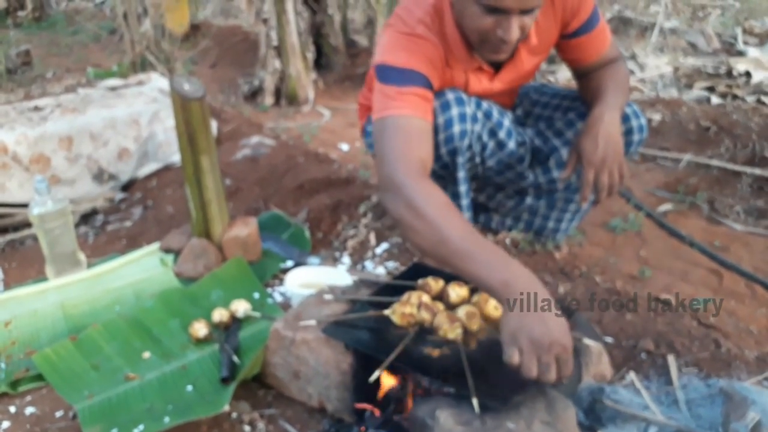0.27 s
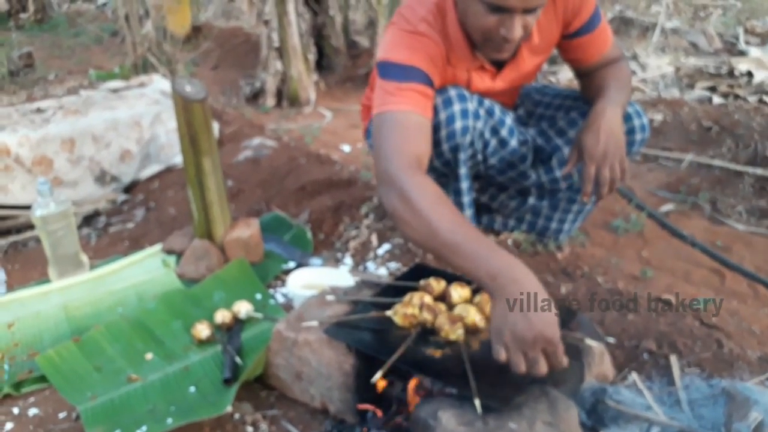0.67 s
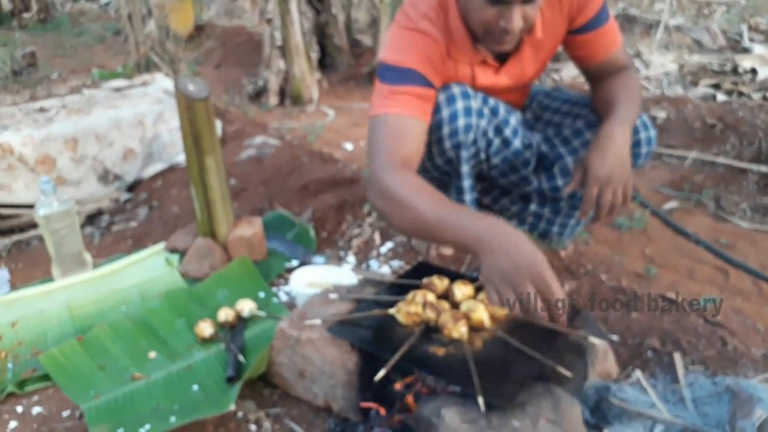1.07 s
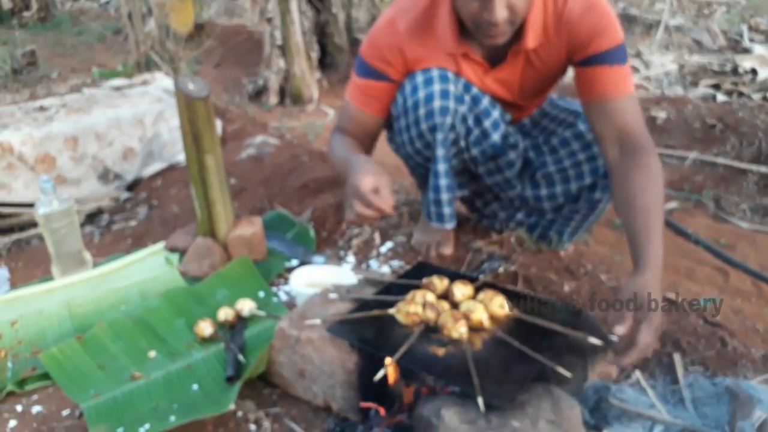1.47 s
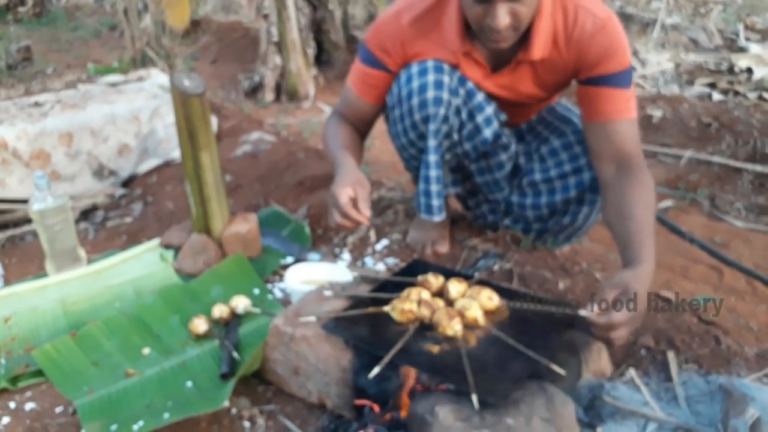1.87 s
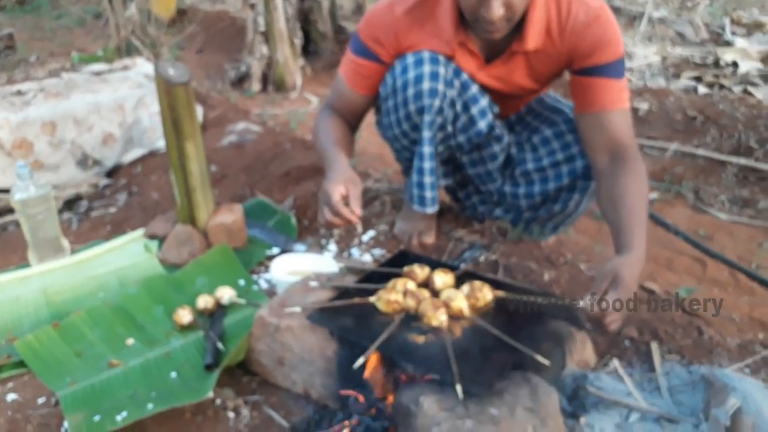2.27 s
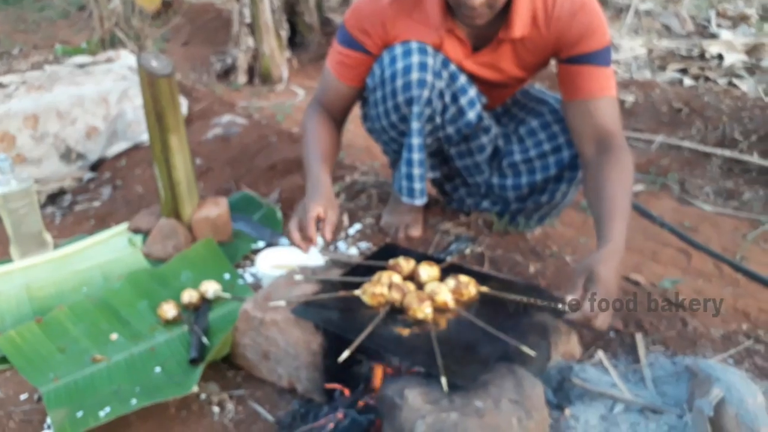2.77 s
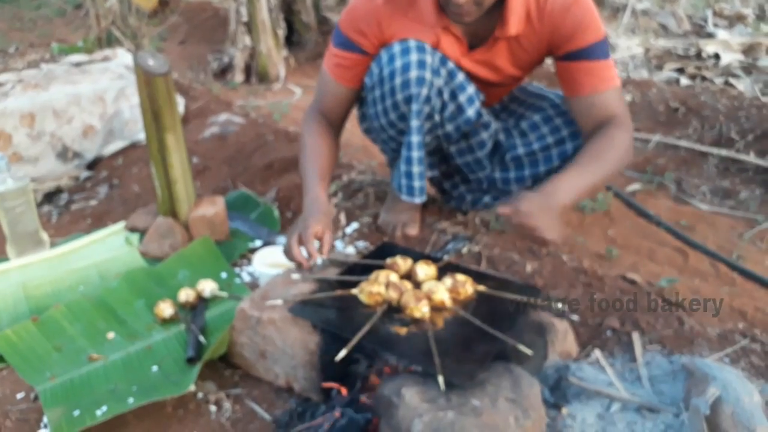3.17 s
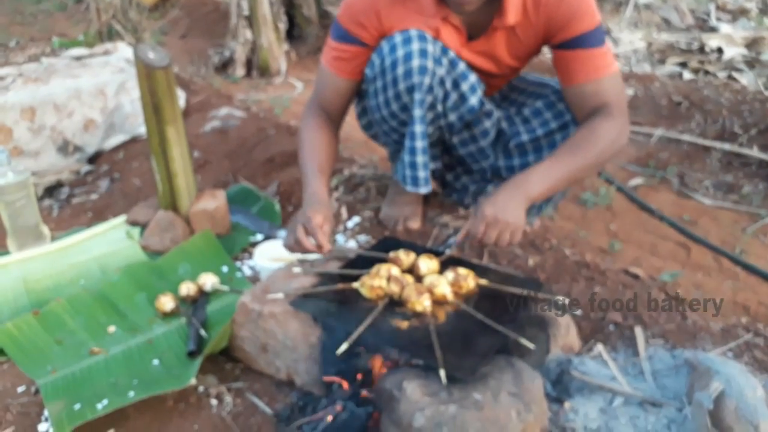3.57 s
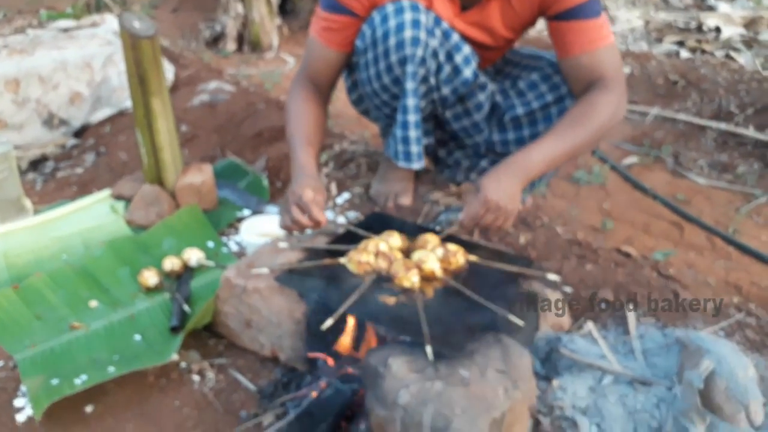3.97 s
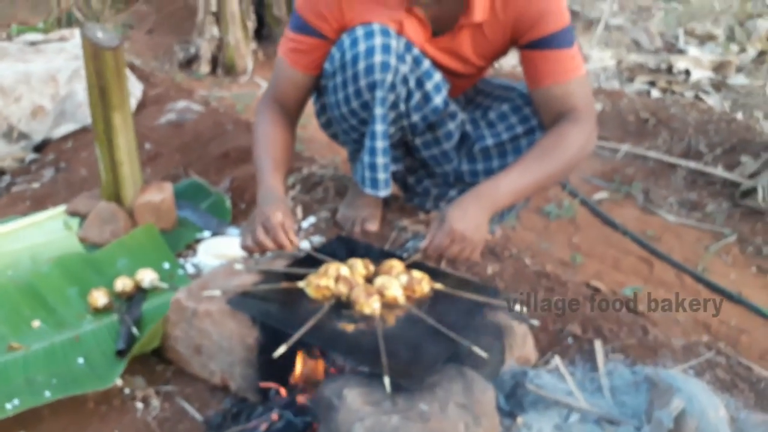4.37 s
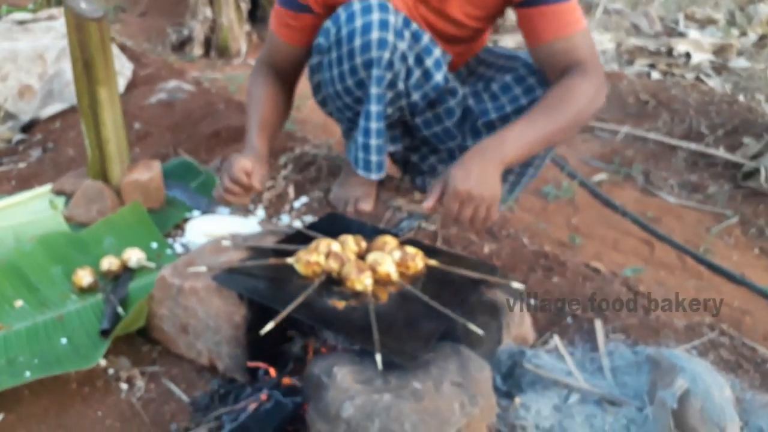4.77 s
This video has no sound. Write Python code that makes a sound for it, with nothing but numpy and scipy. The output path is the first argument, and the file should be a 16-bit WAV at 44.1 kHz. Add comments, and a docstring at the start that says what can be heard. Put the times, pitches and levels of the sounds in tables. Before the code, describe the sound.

Oil sizzles lightly and steadily under skewered food on a flat pan for the whole five seconds, fairly close and outdoors. The sound is a fine, high fizz with irregular ticks of bursting bubbles, the clearest at about 1.5 seconds and others near 1.2 and 3.4. The wood fire gives soft, short thuds, mostly between 2 and 3 seconds. At about 3.7 seconds the wood spits, and at 3.9 it gives one sharp pop, the loudest moment. Around then the sizzle turns muffled and stays duller, dropping in level at the very end. In the background a small bird gives five short, high, raspy falling chirps, at roughly 0.2, 1.1, 1.9, 3.7 and 4.8 seconds. Very faint rustles come around 2.2 to 2.6 seconds and again after 4.3. A barely audible low murmur of air lies underneath.

```python
"""Skewers sizzling over a wood fire

Skewered food fries in oil on a flat pan, outdoors. Countless tiny bubbles burst into a sizzle,
larger ones tick, and the sizzle turns muffled late on. The fire thuds softly as gas flares, then
spits once and gives one sharp pop as steam breaks out of the wood. Behind it are soft rustles
around the stove, a small bird chirping five times among the trees, and a low murmur of air."""
import sys
import numpy as np
from scipy import signal
from scipy.fft import rfft, irfft, next_fast_len
from scipy.io import wavfile
from scipy.ndimage import map_coordinates

SR = 44100
rng = np.random.default_rng(int(sys.argv[2]) if len(sys.argv) > 2 else 0)


def inscribe(sig):
    """Save sig as 16-bit PCM at rate SR to the path in sys.argv[1].

    A 1-D sig is mono; a 2-D sig holds one channel per row.
    Samples are clipped to [-1, 1] before scaling.
    """
    pcm = np.round(np.clip(np.atleast_2d(sig).T, -1, 1) * 32767)
    wavfile.write(sys.argv[1], SR, pcm.astype(np.int16))


N = 221776
TIME = np.arange(N) / SR


# How hard the oil fries: time_s, level_db
FRYING_LEVEL = [(0.0, -51.5), (0.25, -50.5), (0.6, -50.5), (1.08, -47), (1.46, -49), (1.62, -51),
                (2.72, -48.5), (3.35, -51.5), (3.78, -48), (4.43, -50), (4.89, -51), (5.03, -60.5)]

def sizzle(fizz_db=1.07, thinning_db=2, pops_db=-5.5, bubbles_db=-3):
    """Bursting bubbles: a dense fizz that thins when muffled, under flurries of sparser pops."""
    fizz = amp(fizz_db - thinning_db * curve(MUFFLING)) * bursts(per_s=7000, spread_db=2.0)
    pops = amp(pops_db) * bursts(per_s=370, spread_db=7.0)
    flurry = amp(1.6 * wobble(70))
    surge = amp(1.1 * wobble(45))
    crackle = (pops + amp(bubbles_db) * bubbles()) * flurry
    return amp(curve(FRYING_LEVEL)) * surge * sizzle_colour(fizz + crackle, makeup_db=6.5)


# Crackling bubbles, one row a size: pitch_hz, bursts_per_s, level_db
BUBBLE_SIZES = [(3790, 230, -4.5), (4620, 150, -8), (6200, 200, -3.5), (8200, 160, -3), (12500, 140, -2)]

def bubbles():
    """Each bubble rings for a cycle or two at the pitch of its size."""
    out = np.zeros(N)
    for hz, per_s, db in BUBBLE_SIZES:
        ring = signal.iirpeak(hz, Q=2.7, fs=SR)
        out += amp(db) * unit(signal.lfilter(*ring, bursts(per_s, spread_db=6.5)))
    return out


# Crossfade from an open (0) to a muffled (1) sound: time_s, muffled_share
MUFFLING = [(0, 0.01), (2.0, 0.14), (2.3, .19), (3.6, 0.06), (3.92, 0.87), (4.5, 0.93), (5.03, 0.95)]
# EQ of the open sizzle: frequency_hz, gain_db
OPEN_SIZZLE_EQ = [(300, -33), (1200, -24.5), (1900, -19), (2400, -12), (2850, -13.5), (3500, -1),
                  (4300, -3.5), (5400, 1.5), (5900, -2), (6800, 3), (8300, -1), (9400, -9), (11000, -7.5),
                  (12700, -6), (15800, -12)]
# EQ of the muffled sizzle: frequency_hz, gain_db
MUFFLED_SIZZLE_EQ = [(300, -20.5), (1000, -36.5), (1700, -23.5), (2150, -10.5), (2900, -13), (3800, 0),
                     (4600, -1.5), (5900, -8), (7300, -15.5), (9000, -32), (12800, -25.5), (15800, -21)]

def sizzle_colour(x, makeup_db):
    """The sizzle goes from open to muffled; the muffled side gets make-up gain."""
    share = curve(MUFFLING)
    muffled = amp(makeup_db) * coloured(x, MUFFLED_SIZZLE_EQ)
    return (1 - share) * coloured(x, OPEN_SIZZLE_EQ) + share * muffled


# The largest bubbles bursting: start_s, level_db
BUBBLE_TICKS = [(0.0838, -29), (0.1851, -27), (0.9328, -22), (0.9692, -27), (1.031, -28), (1.1293, -26),
                (1.2182, -19), (1.4569, -14), (1.5623, -26), (1.5751, -26), (1.7928, -26), (1.9709, -23),
                (2.0253, -27), (2.2266, -25), (2.2553, -23), (2.2666, -26), (2.4079, -25), (2.5455, -27),
                (2.6758, -21), (2.8231, -26), (2.9546, -26), (2.9708, -26), (3.1731, -24), (3.3723, -18),
                (3.4149, -30), (3.4915, -22), (3.7576, -20), (3.7721, -24), (3.7978, -24), (4.3277, -24),
                (4.3763, -28), (4.4622, -30), (4.6203, -27), (4.7549, -27), (4.8399, -26)]

def ticks(open_hz=6600, muffled_hz=4180, spread_octaves=0.17, rise_s=0.0006, scatter_t60_s=0.02):
    """Large bubbles snap with a bright edge, lower when muffled; pan and stones scatter the sound."""
    muffling = curve(MUFFLING)
    impulses, snaps = np.zeros(N), []
    for start, db in BUBBLE_TICKS:
        crest = round((start + rise_s) * SR)
        hz = open_hz + (muffled_hz - open_hz) * muffling[crest]
        detune = 2 ** (spread_octaves * rng.standard_normal())
        snaps.append((crest / SR, db, hz * detune))
        impulses[crest] = amp(db)
    decay = amp(-60 * TIME[:SR // 25] / scatter_t60_s)
    scatter = amp(-9.5) * signal.fftconvolve(impulses, decay)[:N] * rng.standard_normal(N)
    snap = amp(-1.5) * clicks(snaps, cycles=1)
    glint_eq = [(1000, -25), (7000, -18), (10500, -1), (13000, 0), (16000, -3)]
    glint = amp(-1) * coloured(impulses, glint_eq) * (1 - 0.7 * muffling)
    return snap + glint + sizzle_colour(scatter, makeup_db=1)


# Rushes of steam from the wood: crest_s, level_db, rise_s, fall_s, bass_db
STEAM_SPITS = [(3.678, -31.5, 0.0043, 0.0035, 1.5), (3.885, -24.5, 0.0045, 0.0086, 0.5)]
# EQ of a rush: frequency_hz, gain_db
STEAM_EQ = [(50, -20), (130, 3.5), (320, -6), (680, -4), (1100, -5.5), (2600, -4), (4200, -3.5), (6200, -6),
            (7800, -11.5), (9200, -26), (12500, -20.5), (15800, -22)]
# Hard cracks inside the rushes: crest_s, level_db, pitch_hz
WOOD_CRACKS = [(3.6778, -24, 4500), (3.6811, -23, 5000), (3.8853, -12, 5200), (3.8874, -18, 4200),
               (3.8936, -10.5, 4600)]

def spits():
    """Steam breaks out of the burning wood: a rush of a few milliseconds with hard cracks in it."""
    out = np.zeros(N)
    for crest, db, rise, fall, bass_db in STEAM_SPITS:
        age = (TIME - crest) / np.where(TIME < crest, rise, fall)
        swell = np.exp(-age ** 2 / 2) * (age > -2) * (age < 1.55)  # gated hard at both ends
        eq = [(hz, gain_db + bass_db / (1 + hz / 2000)) for hz, gain_db in STEAM_EQ]
        out += amp(db) * swell * unit(coloured(rng.standard_normal(N), eq))
    out += clicks(WOOD_CRACKS, cycles=0.82)
    return out + amp(-26.5) * reverb(out, t60_s=0.38, build_s=0.0046)


# Soft thuds of the fire: centre_s, peak_db, pitch_hz
GAS_PUFFS = [(0.999, -56.5, 141), (2.0844, -54, 420), (2.1781, -44.5, 410), (2.187, -53, 370),
             (2.2404, -48.5, 374), (2.3205, -46.5, 590), (2.6402, -40.5, 635), (2.7152, -41.5, 1550),
             (2.868, -53, 377), (3.6831, -37.5, 300), (4.079, -54.5, 183), (4.131, -57, 260),
             (4.783, -49.5, 265)]

def puffs():
    """Pockets of gas flare in the fire: one push of air and one pull."""
    out = np.zeros(N)
    for centre, db, hz in GAS_PUFFS:
        phase = 2 * np.pi * hz * (TIME - centre)
        out -= amp(db) * phase * np.exp((1 - np.minimum(phase ** 2, 100)) / 2)
    return out + amp(-13.5) * reverb(out, t60_s=0.15, build_s=0.005)


# Soft scuffs around the stove: crest_s, level_db, half_length_s, pitch_hz
STOVE_RUSTLES = [(2.186, -61, 0.0068, 830), (2.267, -46.5, 0.0025, 2300), (2.363, -68, 0.027, 388),
                 (2.557, -61, 0.016, 2100), (4.32, -70.5, 0.029, 785), (4.322, -66.5, 0.023, 109),
                 (4.44, -67.5, .02, 129), (4.787, -58.5, 0.0054, 70), (5.004, -58, 0.024, 2500)]

def rustles():
    """Brief grainy rubs, each a band of sound around its pitch."""
    out = np.zeros(N)
    for crest, db, half_length, hz in STOVE_RUSTLES:
        band = [(hz / 4, -30), (hz * .6, -12), (hz * .85, 0),
                (hz * 1.2, 0), (hz * 2.5, -20), (hz * 6, -50)]
        rub = coloured(bursts(per_s=1400, spread_db=9), band)
        swell = np.exp(-((TIME - crest) / half_length) ** 2 / 2)
        out += amp(db) * swell * unit(rub)
    return out


# Calls of the small bird: start_s, level_db, start_pitch_hz, overtone_db
BIRD_CHIRPS = [(.174, -40, 5020, -5), (1.117, -41, 4950, -4), (1.87, -39.5, 4840, -4),
               (3.678, -41.5, 5120, -11), (4.768, -44, 4900, -18)]

def bird(length_s=0.07, end_hz=4020):
    """Each raspy chirp slides down, roughens and grows side tones as it falls; the trees prolong it."""
    song = np.zeros(N)
    for start, db, start_hz, overtone_db in BIRD_CHIRPS:
        progress = np.clip((TIME - start) / length_s, 0, 1)
        pitch = start_hz + (end_hz - start_hz) * progress ** 0.65
        rasp = 0.028 * (0.5 + progress) * wobble(700)
        phase = 2 * np.pi * np.cumsum(pitch * (1 + rasp)) / SR
        swell = np.abs(np.sin(np.pi * progress ** 0.6)) * amp(1.5 * wobble(250))
        octave_above = amp(overtone_db) * np.sin(2 * phase)
        hoarse_octave_below = amp(-22) * wobble(600) * np.sin(phase / 2)
        side_tones = np.minimum(2 * progress, 1) ** 4 * (octave_above + hoarse_octave_below)
        song += amp(db) * swell * (np.sin(phase) + side_tones)
    trees = coloured(reverb(song, t60_s=0.62, build_s=0.01), [(5000, -2), (8000, -8)])
    return song + trees


# EQ of the outdoor bed: frequency_hz, gain_db
AIR_EQ = [(20, -13), (45, -9), (75, -0.5), (120, 2.5), (200, -7), (400, -13.5), (900, -14), (2000, -16),
          (5000, -40)]

def air(level_db=-75, drift_db=1.26):
    """The fire and the open air murmur low and steadily."""
    return amp(level_db + drift_db * wobble(13)) * unit(coloured(rng.standard_normal(N), AIR_EQ))


def amp(db):
    """Decibels to gain."""
    return 10 ** (np.asarray(db) / 20)


def unit(x):
    """x at rms 1."""
    return x / np.sqrt(np.mean(x ** 2) + 1e-20)


def curve(rows):
    """An automation line through (time_s, value) rows."""
    return np.interp(TIME, *np.transpose(rows))


def wobble(per_s):
    """A smooth random curve with per_s knots a second."""
    return map_coordinates(rng.standard_normal(int(N * per_s / SR) + 4), [TIME * per_s])


def coloured(x, eq, size=2048):
    """x through a minimum-phase EQ of (frequency_hz, gain_db) points."""
    hz, db = np.transpose(eq)
    gain = amp(np.interp(np.log(np.fft.rfftfreq(size, 1 / SR) + 1), np.log(hz), db))
    cepstrum = irfft(np.log(gain))[:size // 2]
    cepstrum[0] /= 2
    response = irfft(np.exp(rfft(2 * cepstrum, size)))
    return signal.fftconvolve(x, response)[:N]


def bursts(per_s, spread_db):
    """Impulses at random moments: many small, few large."""
    happens = rng.random(N) < per_s / SR
    size = amp(spread_db * np.minimum(rng.standard_normal(N), 2.3))
    return unit(happens * size * rng.choice([-1, 1], N))


def clicks(rows, cycles):
    """Clicks from (crest_s, level_db, pitch_hz) rows; each swings about once at its pitch."""
    out = np.zeros(N)
    t = np.arange(-SR // 500, SR // 500) / SR
    for crest, db, hz in rows:
        swing = np.exp(-(t * hz / cycles) ** 2) * np.sin(2 * np.pi * (hz * t + rng.random()))
        out[round((crest + t[0]) * SR):][:len(t)] += amp(db) * swing
    return out


def reverb(x, t60_s, build_s):
    """A diffuse tail for x, of about the same energy."""
    t = TIME[:SR]
    tail = rng.standard_normal(SR) * amp(-60 * t / t60_s) * (1 - np.exp(-t / build_s))
    return signal.fftconvolve(x, tail / np.linalg.norm(tail))[:N]


def scene():
    """Pan, fire and surroundings in mono, alike on both channels."""
    mono = sizzle() + ticks() + puffs() + spits() + rustles() + bird() + air()
    return np.array([mono, mono])


def record(dry):
    """A brick-wall low-pass takes off the very top."""
    cutoff_hz = 15950
    size = next_fast_len(N + SR // 2)
    passband = np.fft.rfftfreq(size, 1 / SR) < cutoff_hz
    return irfft(rfft(dry, size) * passband, size)[:, :N]


dry = scene()
out = record(dry)
inscribe(out)
```